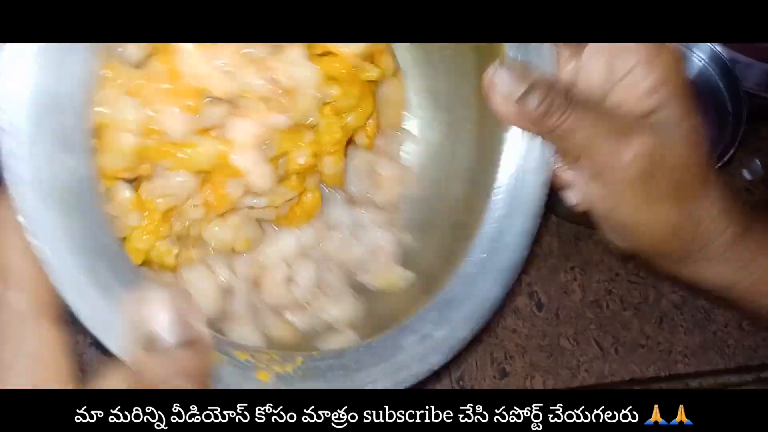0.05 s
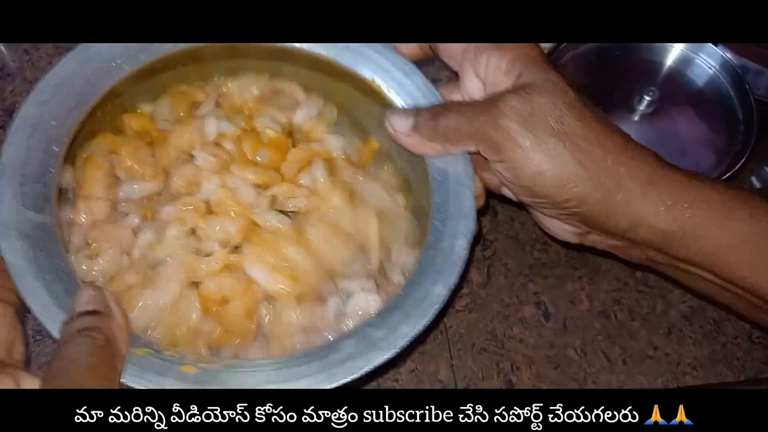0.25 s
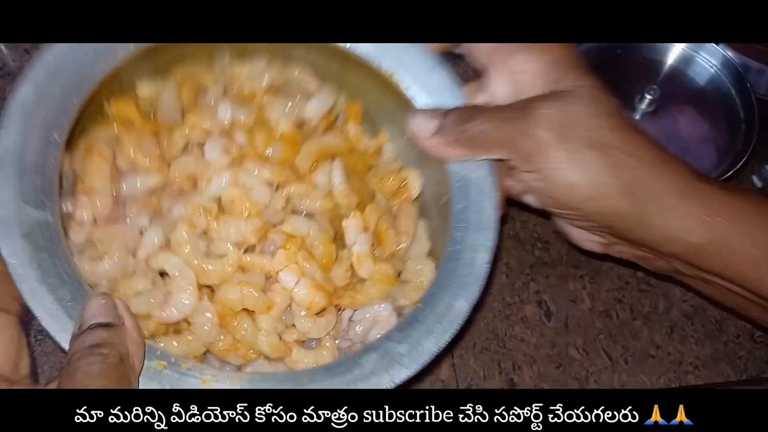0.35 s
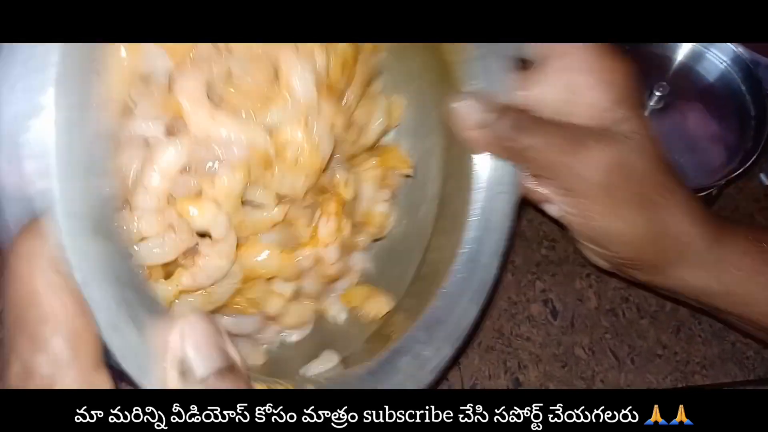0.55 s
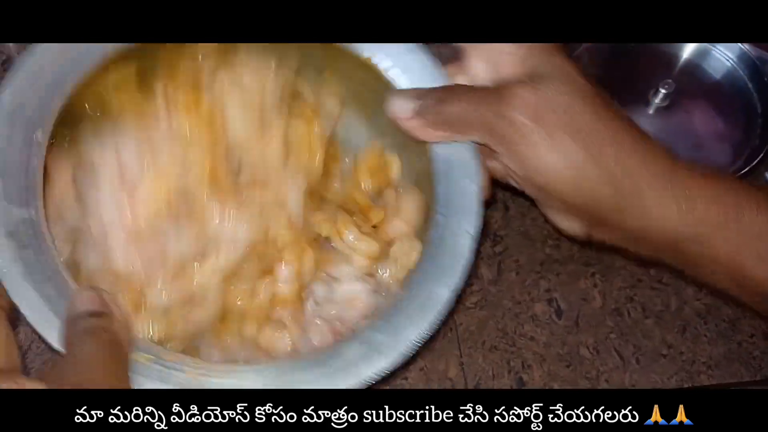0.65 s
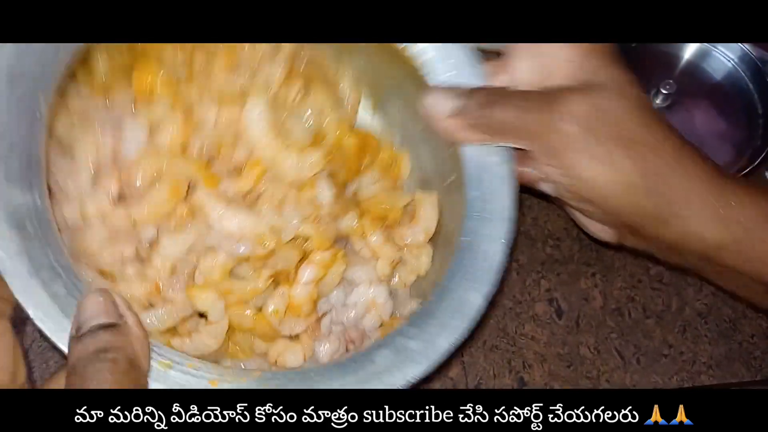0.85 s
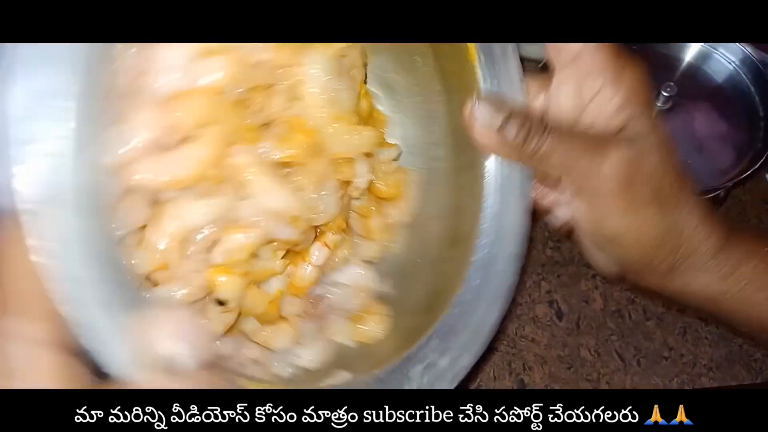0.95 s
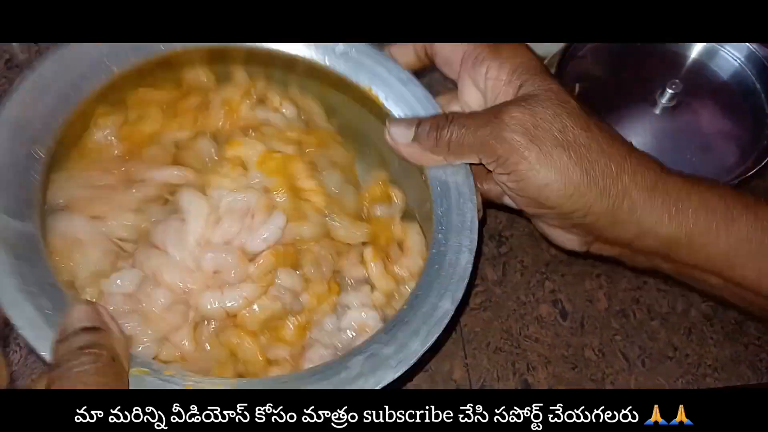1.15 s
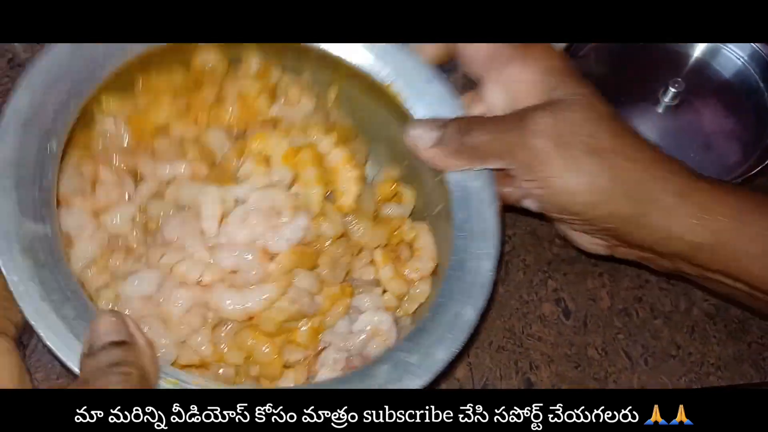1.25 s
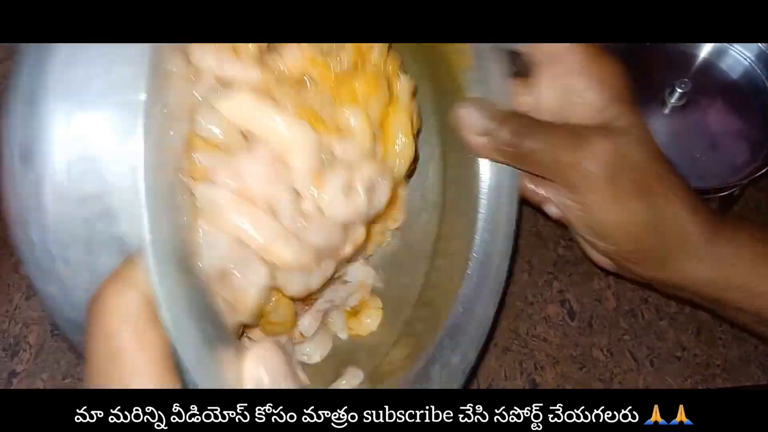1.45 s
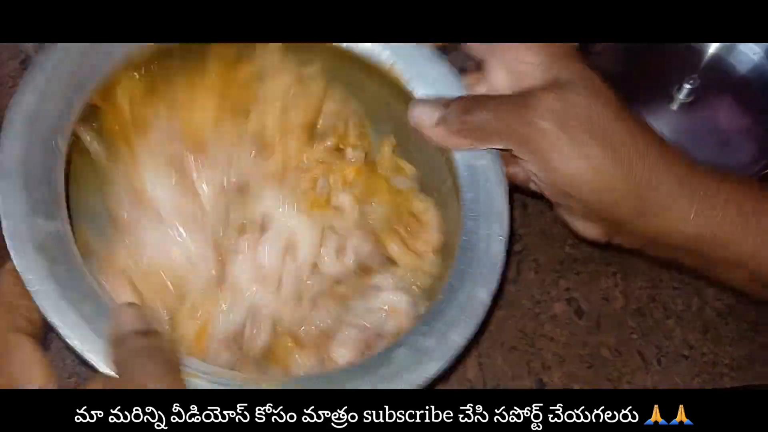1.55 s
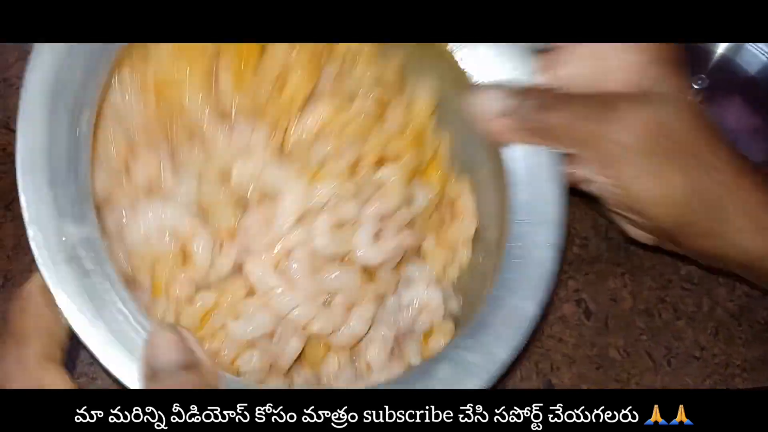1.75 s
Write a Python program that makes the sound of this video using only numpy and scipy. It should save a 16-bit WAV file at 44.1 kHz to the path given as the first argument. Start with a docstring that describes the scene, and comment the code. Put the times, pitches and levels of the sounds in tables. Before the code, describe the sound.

Four wet squelches come in an even rhythm as raw prawns slither up a metal bowl and drop back with small slaps and pops. The microphone is close, and a motor hums faintly in the quiet kitchen.

```python
"""Four wet squelches: marinated prawns tossed in a metal bowl in a small kitchen.
On each toss the heap slides up the wall and peels off with soft plops, then lands with slaps,
squirts of marinade and bursting air pockets. The load damps the bowl, leaving a short echo.
The room rings briefly and a motor hums behind."""
import sys
import numpy as np
from scipy import signal
from scipy.fft import rfft, irfft
from scipy.io import wavfile

SR = 44100
rng = np.random.default_rng(int(sys.argv[2]) if len(sys.argv) > 2 else 0)


def dump_mix(stems):
    """Bounce the given channels to the path in sys.argv[1] as a 16-bit WAV at rate SR."""
    frames = np.atleast_2d(stems).T  # one column per channel
    limited = np.clip(frames, -1, 1)  # hard clip at full scale
    pcm = np.round(limited * 32767).astype(np.int16)
    wavfile.write(sys.argv[1], SR, pcm)


N = 79380
T = np.arange(N) / SR

# heap lands: full_level_s, hold_s, squelch_db, rise_db_per_s, fall_db_per_s, squish_db
HEAP_LANDINGS = [(0.216, 0.0084, -18.5, 804, 1047, -32), (0.679, 0.022, -26, 596, 1040, -24.5),
                 (1.14, 0.016, -24, 637, 493, -36), (1.594, 0.004, -28, 380, 409, -34.5)]
# single prawns hit the metal: start_s, relative_db
PRAWN_SLAPS = [(0.178, -27.5), (0.1952, -26), (0.208, -10), (0.2182, -9), (0.2221, -8.5), (.2315, -14),
               (0.656, -24), (0.6802, -11.5), (0.697, -8), (1.015, -25), (1.105, -23.5), (1.1102, -20.5),
               (1.1408, -14), (1.163, -10.5), (1.5505, -20.5), (1.586, -28), (1.593, -9), (1.6042, -15)]
# marinade squirts between prawns: full_level_s, centre_hz, level_db, hold_s
MARINADE_SQUIRTS = [(.195, 5600, -28.5, 0.0024), (.597, 4300, -40, 0.0052), (.632, 5200, -37.5, 0.0085),
                    (.6425, 3750, -31.5, 0.0091), (.658, 5300, -33, 0.0028), (.698, 3870, -18.5, 0.0025),
                    (1.1425, 4040, -29, 0.006), (1.1478, 5360, -20, 0.0018), (1.160, 3600, -28.5, 0.0065),
                    (1.545, 3700, -29.5, 0.0013), (1.595, 3770, -20.5, 0.0024), (1.6045, 3700, -30, 0.0018)]
# trapped air bursts: start_s, pitch_hz, relative_db, t60_s, left_minus_right_db
AIR_POCKETS = [(.083, 1180, -45, 0.04, -3), (.112, 800, -39, 0.015, -17), (.119, 783, -29.5, 0.025, 5),
               (0.2157, 990, -5.5, 0.013, -2.5), (0.2196, 1127, 0.5, 0.0062, 1),
               (0.5445, 1383, -26.5, 0.023, 5), (0.566, 1400, -38, 0.027, 7), (.573, 810, -36.5, .03, -1),
               (.589, 790, -39, 0.018, 7), (.676, 558, -24.5, 0.049, 0), (.6812, 1166, -12.5, .017, 5),
               (.691, 846, -33, 0.075, 6), (.96, 600, -46.5, 0.026, 4), (1.007, 1360, -30, 0.018, 7),
               (1.0176, 1550, -19.5, 0.016, 6), (1.026, 963, -28, 0.043, 5),
               (1.130, 868, -12.5, 0.015, -1.5), (1.1332, 728, -15.5, 0.025, -1),
               (1.151, 1002, -16, 0.013, -2.5), (1.176, 983, -28.5, 0.023, -7),
               (1.381, 1416, -44.5, 0.018, 7.5), (1.446, 1330, -34, 0.023, 6),
               (1.452, 1460, -25.5, 0.027, 5.5), (1.4621, 1201, -21.5, 0.039, 8),
               (1.4687, 842, -26, 0.065, 1.5), (1.561, 842, -29.5, 0.054, -1),
               (1.5905, 823, -18, 0.016, -1), (1.598, 955, -14.5, 0.011, 4), (1.625, 892, -26.5, 0.029, -3),
               (1.632, 826, -26, 0.042, 1)]
# heap slides up the wall: full_level_s, hold_s, level_db, rise_db_per_s, fall_db_per_s
HEAP_SLIDES = [(0.112, 0.0073, -45, 271, 200), (0.55, 0.061, -46, 750, 153), (1.02, 0.017, -41, 809, 281),
               (1.448, 0.028, -44, 1087, 242)]
# thin squeak as a lift begins: full_level_s, centre_hz, level_db, hold_s
LIFT_SQUEAKS = [(.068, 10880, -51, 0.0077), (.528, 10900, -50, 0.0078), (.968, 10350, -57, 0.0055),
                (1.394, 11100, -56, 0.0034), (1.76, 10200, -62, 0.0069)]

# bright part of a landing: freq_hz, relative_db
SQUELCH_SPECTRUM = [(40, -34), (150, -29.5), (400, -16), (900, 4.5), (1800, -6), (2400, 0.5), (3100, -4),
                    (3900, 4.5), (5400, -6), (6600, -15.5), (8200, -14.5), (10500, -8.5), (12500, -4.5),
                    (14000, -10.5), (16000, -17.5)]
# low part of a landing: freq_hz, relative_db
SQUISH_SPECTRUM = [(40, -52.5), (150, -18), (330, -9.5), (500, -10.5), (800, 4), (1300, 1), (2000, 1.5),
                   (4000, -14), (12000, -67)]
# prawn striking metal: freq_hz, relative_db
SLAP_SPECTRUM = [(40, -23), (300, -20.5), (800, 1.5), (2000, -0.5), (4000, 0), (5600, 3), (6800, -30.5),
                 (8500, -8), (11500, -3), (13500, -17), (16000, -20)]
# wet friction: freq_hz, relative_db
SLIDE_SPECTRUM = [(40, -45), (150, -33), (420, -5), (750, 1), (1500, 1), (2500, -5), (4500, 0.5),
                  (6800, -17), (8500, -20), (11500, -9), (14000, -24), (16000, -17)]

# room decay: freq_hz, t60_s
KITCHEN_DECAY = [(300, 0.37), (800, 0.32), (2000, .33), (5000, .32), (14000, 0.25)]
# room tail strength: freq_hz, gain_db
KITCHEN_GAIN = [(100, 2), (400, -6.5), (900, -11.5), (2000, -8.5), (4500, -8), (7000, -5.5), (13000, -7.5)]
# left-right likeness of diffuse sound: freq_hz, correlation
EAR_CORRELATION = [(60, 0.78), (250, 0.86), (600, 0.56), (1200, 0.13), (3000, 0.11), (12000, 0.033)]
# motor hum: pitch_hz, level_db
MOTOR_TONES = [(165.5, -71.5), (247.0, -56), (264.2, -53.5), (295.8, -57), (397, -80), (492, -75)]
# room air: freq_hz, relative_db
AIR_SPECTRUM = [(25, -31), (55, -15.5), (110, 1.5), (200, 8.5), (300, 6.5), (420, -5.5), (800, -42),
                (2000, -17), (4500, -6.5), (7000, -29), (11500, -18), (16000, -30)]
# colour mismatch of the two microphone ports: freq_hz, left_minus_right_db
MIC_BALANCE = [(280, 0), (600, -1), (1400, -1), (2400, -0.5), (3400, -12), (5200, -10), (6200, -3),
               (7300, 10), (8500, 7), (9900, -17), (11700, -8), (13200, -1), (15200, 5.5)]


def landings(slap_t60_s=0.011, slap_trim_db=-5.5):
    """The falling heap squelches and squirts marinade; single prawns slap the metal."""
    squelch_level = squish_level = slap_level = 0
    for at_s, hold_s, squelch_db, rise, fall, squish_db in HEAP_LANDINGS:
        squelch_level += swell(at_s, hold_s, squelch_db, rise, fall)
        squish_level += swell(at_s, hold_s, squish_db, 1.5 * rise, 2.3 * fall)
    for start_s, db in PRAWN_SLAPS:
        decay_db = 60 * np.abs(T - start_s) / slap_t60_s
        slap_level += (T >= start_s) * from_db(db + slap_trim_db - decay_db)
    films = stereo_crackle(width=0.68, snaps_per_s=4600, spread_db=10, hiss=0.76)
    squelch = colour(squelch_level * films, SQUELCH_SPECTRUM)
    squish = colour(squish_level * rng.standard_normal(N), SQUISH_SPECTRUM)
    spatter = stereo_crackle(width=0.68, snaps_per_s=12000, spread_db=0, hiss=0.67)
    slaps = colour(slap_level * spatter, SLAP_SPECTRUM)
    squirts = whistles(MARINADE_SQUIRTS, width_hz=1100)
    return placed(squelch + squish + slaps + squirts, pan_db=-1.3)


def air_pockets(attack_s=0.00067, wobble_hz=1305, trim_db=1.5, low_cut_hz=444):
    """Each bursting pocket rings briefly; pitch and level flutter as its soft walls move."""
    pops = np.zeros((2, N))
    for start_s, pitch_hz, db, t60_s, pan_db in AIR_POCKETS:
        age_s = np.maximum(T - start_s, 0)
        hz = pitch_hz * (1 + 0.11 * drift(wobble_hz))
        phase = 2 * np.pi * np.cumsum(hz * (age_s > 0)) / SR
        attack = 1 - np.exp(-age_s / attack_s)
        decay = from_db(db + trim_db - np.minimum(60 * age_s / t60_s, 200))
        flutter = 1 + 0.37 * drift(wobble_hz)
        pops += placed(attack * decay * flutter * np.sin(phase), pan_db)
    return signal.sosfilt(signal.butter(2, low_cut_hz, "high", fs=SR, output="sos"), pops)


def slides(stir_db=-65):
    """The heap slithers over wet metal and keeps stirring faintly between tosses."""
    level = sum(swell(*row) for row in HEAP_SLIDES) + from_db(stir_db)
    films = stereo_crackle(width=0.56, snaps_per_s=5000, spread_db=4, hiss=0.69)
    return placed(colour(level * films, SLIDE_SPECTRUM), pan_db=3)


def whistles(rows, width_hz):
    """Short rough squirts or squeaks: noise in a resonance, partly evened in level."""
    bursts = 0
    for at_s, centre_hz, db, hold_s in rows:
        pole = np.exp((-np.pi * width_hz + 2j * np.pi * centre_hz) / SR)
        ring = signal.lfilter([1], np.poly([pole, pole]), rng.standard_normal(N))
        evened = unit_rms(ring.real / np.sqrt(np.abs(ring) + 1e-9))
        bursts += evened * swell(at_s, hold_s, db, rise_db_per_s=39994, fall_db_per_s=7000)
    return bursts


def crackle(snaps_per_s, spread_db, hiss, bands=28, t60_cycles=8.4):
    """Tiny wet films snap at random, each ringing a few cycles, over fine hiss; roughly white."""
    sizes = from_db(spread_db * np.minimum(rng.exponential(1, N), 3)) * rng.choice([-1, 1], N)
    snaps = sizes * (rng.random(N) < snaps_per_s / SR)
    snap_band = rng.integers(0, bands, N)
    rings = 0
    for band, hz in enumerate(np.linspace(np.sqrt(450), np.sqrt(15500), bands) ** 2):
        radius = from_db(-60 * hz / t60_cycles / SR)
        resonator = [1, -2 * radius * np.cos(2 * np.pi * hz / SR), radius ** 2]
        ring = signal.lfilter([1, 0, -1], resonator, snaps * (snap_band == band) + 1e-18)
        rings += unit_rms(ring) * hz ** 0.25  # power follows band spacing
    return unit_rms(unit_rms(rings) + hiss * rng.standard_normal(N))


def stereo_crackle(width, snaps_per_s, spread_db, hiss):
    """Crackle from all over the heap; width is the side-to-mid ratio."""
    mid, side = (crackle(snaps_per_s, spread_db, hiss) for _ in range(2))
    return unit_rms(mid + width * side * [[1], [-1]])


def bowl_echo(x, t60_s=0.06, gain_db=-15):
    """Sound bounces quickly between the bowl's walls."""
    echo = rng.standard_normal((2, N)) * from_db(-60 * np.minimum(T / t60_s, 2))
    return from_db(gain_db) * signal.fftconvolve(x, unit_rms(echo) / np.sqrt(N), axes=1)[:, :N]


def kitchen_reverb(x, onset_s=0.0061):
    """Dense room reflections die away band by band."""
    noise = rfft(diffuse_noise())
    hz = np.linspace(0, SR / 2, noise.shape[1])
    spectrum = noise * from_db(at_hz(KITCHEN_GAIN, hz))
    edges_hz = np.geomspace(40, 20000, 14)
    tail = 0
    for low, high in zip(edges_hz, edges_hz[1:]):
        t60_s = at_hz(KITCHEN_DECAY, np.sqrt(low * high))
        fade = from_db(-60 * T / t60_s) * (1 - np.exp(-T / onset_s))
        band = irfft(spectrum * (hz >= low) * (hz < high), N)
        tail += band * unit_rms(fade) / np.sqrt(N)
    return signal.fftconvolve(x.mean(axis=0)[None], tail, axes=1)[:, :N]


def motor_hum():
    """Close motor tones waver and beat against each other."""
    hum = 0
    for hz, db in MOTOR_TONES:
        amplitude = np.sqrt(2) * from_db(db + 0.46 * drift(rate_hz=7.23))
        phase = 2 * np.pi * (hz * T + rng.random()) + 0.9 * drift(rate_hz=8.46)
        hum += amplitude * np.sin(phase)
    return hum


def room_air(level_db=-58):
    """Soft, steady air noise from all sides."""
    return from_db(level_db) * colour(diffuse_noise(), AIR_SPECTRUM)


def diffuse_noise():
    """Stereo noise, alike in the bass and unrelated in the treble."""
    mid, side = rfft(rng.standard_normal((2, N)))
    alike = at_hz(EAR_CORRELATION, np.linspace(0, SR / 2, len(mid)))
    ears = np.sqrt(1 + alike) * mid + np.sqrt(1 - alike) * side * [[1], [-1]]
    return irfft(ears, N) / np.sqrt(2)


def placed(x, pan_db, max_lag_s=0.00036):
    """Louder and earlier in the nearer ear; positive pan is left."""
    lead_s = np.tanh(pan_db / 10) * max_lag_s * np.array([0.5, -0.5])
    lead_s = np.round(lead_s * SR) / SR
    ears = zip(pan_gains(pan_db), lead_s, np.broadcast_to(x, (2, N)))
    return np.array([gain * np.interp(T + shift_s, T, ear) for gain, shift_s, ear in ears])


def pan_gains(pan_db):
    """Constant-power left and right gains."""
    gains = from_db(np.array([pan_db, -pan_db]) / 2)
    return gains / np.sqrt(np.mean(gains ** 2, axis=0))


def swell(at_s, hold_s, level_db, rise_db_per_s, fall_db_per_s):
    """Rise to full level at at_s, hold, fall; straight in dB."""
    before_s, after_s = np.maximum(at_s - T, 0), np.maximum(T - at_s - hold_s, 0)
    return from_db(level_db - rise_db_per_s * before_s - fall_db_per_s * after_s)


def drift(rate_hz):
    """Unit Gaussian values joined by straight lines."""
    return np.interp(T * rate_hz, np.arange(N), rng.standard_normal(N))


def colour(x, spectrum):
    """Shape a white signal, keeping its power."""
    return minimum_phase(x, lambda hz: unit_rms(from_db(at_hz(spectrum, hz))))


def minimum_phase(x, gain_at):
    """Causal filter with magnitude gain_at(hz)."""
    cepstrum = irfft(np.log(gain_at(np.linspace(0, SR / 2, N + 1)) + 1e-9))
    cepstrum[1:N] *= 2
    cepstrum[N + 1:] = 0
    return irfft(rfft(x, 2 * N) * np.exp(rfft(cepstrum)))[..., :N]


def at_hz(table, hz):
    """Interpolate on a log-frequency axis."""
    freq_hz, values = np.transpose(table)
    return np.interp(np.log(np.maximum(hz, 1)), np.log(freq_hz), values)


def from_db(db):
    return 10 ** (np.asarray(db) / 20)


def unit_rms(x):
    return x / np.sqrt(np.mean(x ** 2) + 1e-20)


def scene():
    """Four tosses in the bowl, in the kitchen, over hum and air."""
    prawns = slides() + landings() + air_pockets() + whistles(LIFT_SQUEAKS, width_hz=1400)
    bowl = prawns + bowl_echo(prawns)
    return bowl + kitchen_reverb(bowl) + motor_hum() + room_air()


def record(dry):
    """Each microphone port colours its channel; peaks are rounded, the top is cut."""
    ceiling, stopband_hz = 1.2, 16600
    left = minimum_phase(dry[0], lambda hz: pan_gains(at_hz(MIC_BALANCE, hz))[0])
    right = minimum_phase(dry[1], lambda hz: pan_gains(at_hz(MIC_BALANCE, hz))[1])
    rounded = ceiling * np.tanh(np.array([left, right]) / ceiling)
    return signal.sosfilt(signal.cheby2(18, 70, stopband_hz, fs=SR, output="sos"), rounded)


dry = scene()
out = record(dry)
dump_mix(out)
```